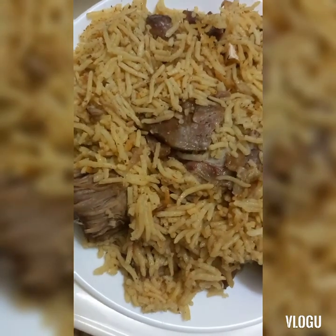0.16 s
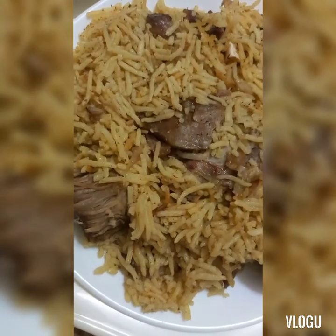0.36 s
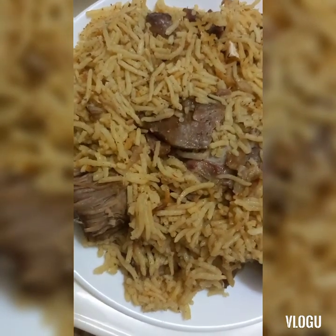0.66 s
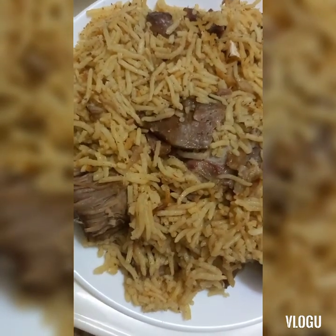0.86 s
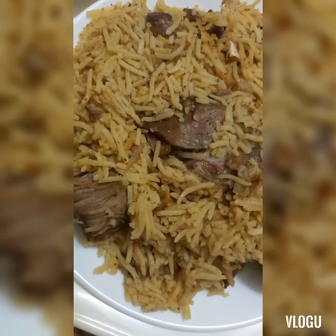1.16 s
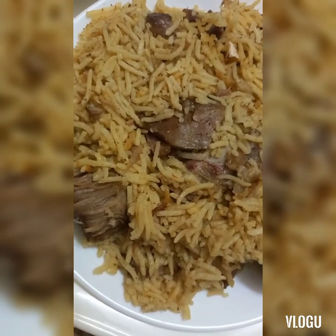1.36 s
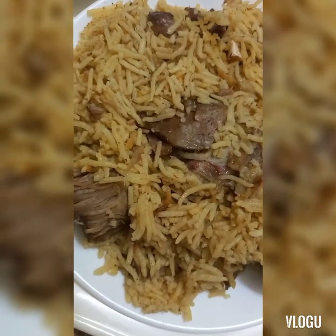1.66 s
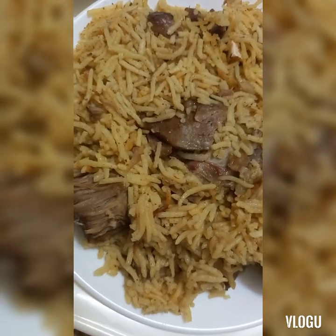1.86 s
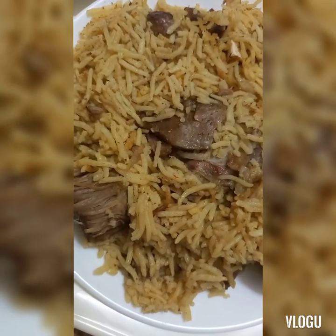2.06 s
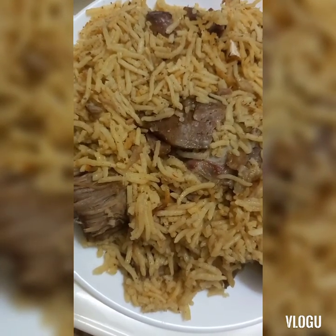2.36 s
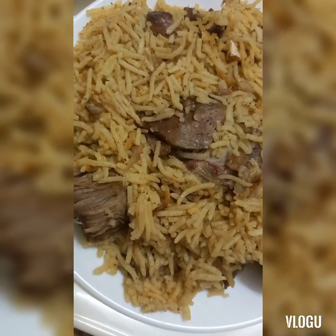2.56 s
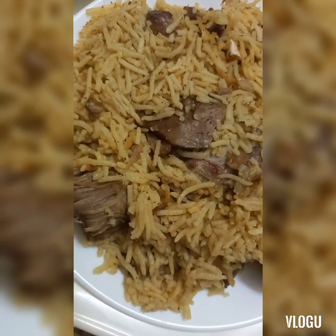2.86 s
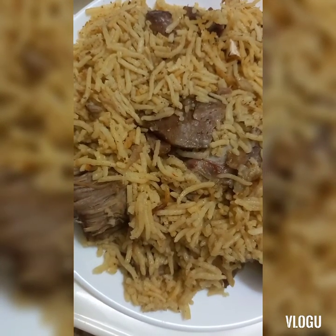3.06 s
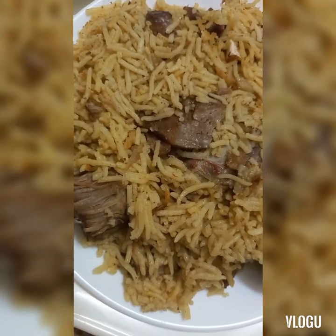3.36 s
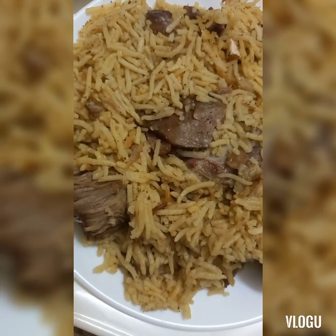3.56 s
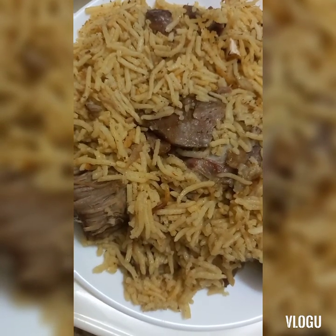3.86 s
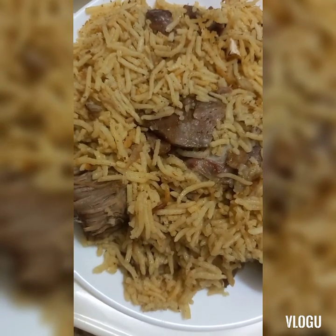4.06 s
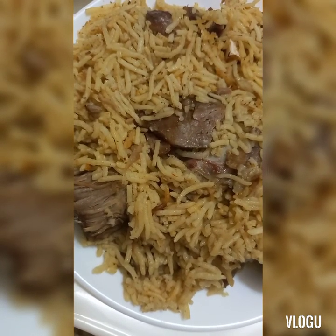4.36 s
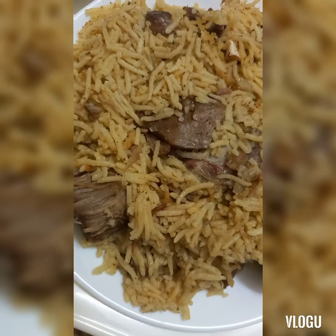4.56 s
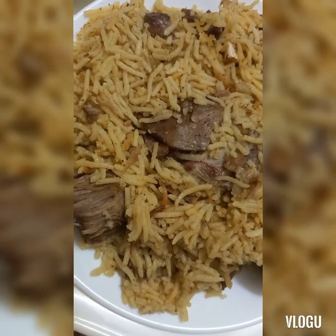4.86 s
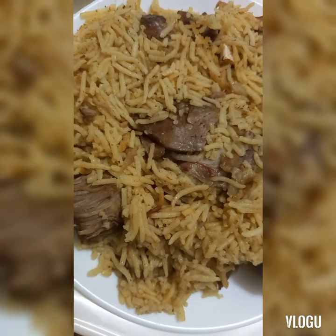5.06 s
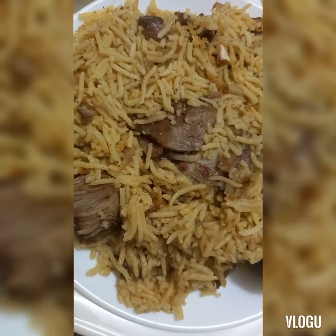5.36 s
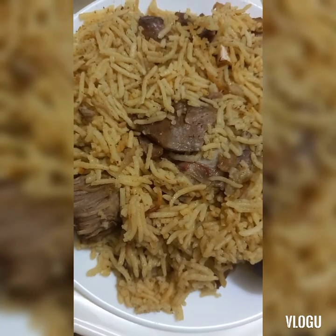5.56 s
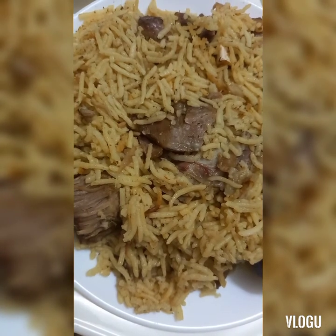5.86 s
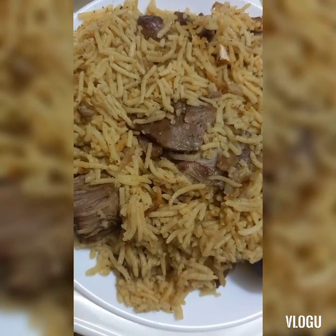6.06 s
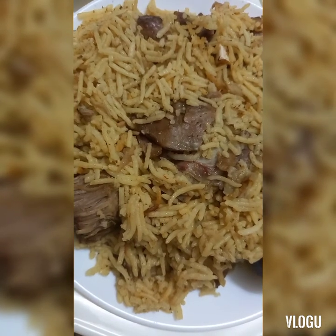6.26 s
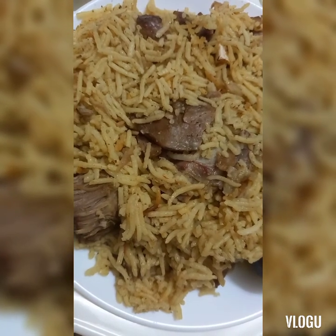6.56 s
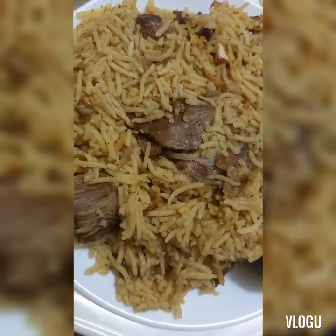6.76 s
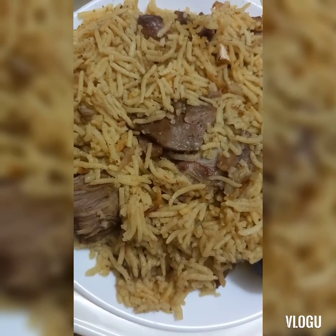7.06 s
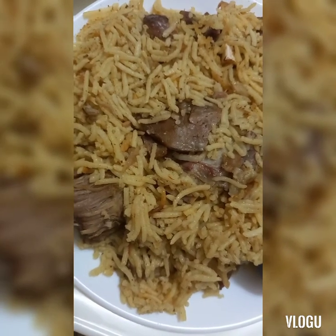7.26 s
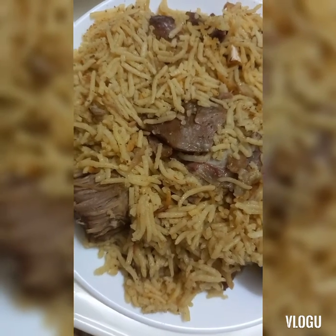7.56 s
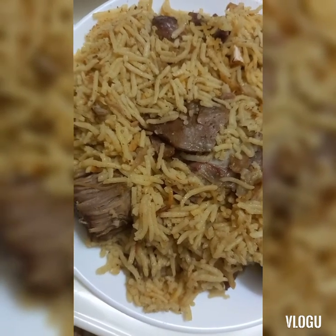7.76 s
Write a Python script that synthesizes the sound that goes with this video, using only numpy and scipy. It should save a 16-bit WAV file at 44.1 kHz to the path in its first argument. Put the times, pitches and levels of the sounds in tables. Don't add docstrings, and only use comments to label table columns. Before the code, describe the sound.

A refrigerator runs without pause in a kitchen. Its compressor gives a deep, steady hum, strongest a little above two hundred hertz, over a noisy low fan rumble coloured by the small room. Faint motor whines waver quickly above it, with a fine rattle and a thin coolant hiss that surges slightly. A phone picks it up in mono, quiet and plain, with no beginning or end.

```python
import sys
import numpy as np
from scipy import signal
from scipy.fft import rfft, irfft
from scipy.io import wavfile
from scipy.ndimage import uniform_filter1d

SR = 44100
rng = np.random.default_rng(int(sys.argv[2]) if len(sys.argv) > 2 else 0)


def boost_factor(decibels):
    exponent = np.asarray(decibels, float) / 20
    return 10 ** exponent


def digitize_waveform(pressure):
    field = np.atleast_2d(pressure).T
    bounded = np.clip(field, -1, 1)
    quanta = np.round(bounded * 32767).astype(np.int16)
    wavfile.write(sys.argv[1], SR, quanta)


N = 349272


def walk(rate):
    hold = int(SR / rate)
    steps = np.repeat(rng.standard_normal(N // hold + 1), hold)
    return 1.25 * uniform_filter1d(uniform_filter1d(steps, hold), hold)[:N]


def tone(phase, db):
    return np.sqrt(2) * boost_factor(db) * np.sin(phase + 2 * np.pi * rng.random())


SHAFT_HZ = 57.639
KNOCK_S = .0066

# t/s, change of turn rate/Hz
SHAFT_DRIFT = [
    (0, .005),
    (3.2, .005),
    (4.2, -.001),
    (5.2, -.006),
    (6.5, -.006),
    (7.2, -.001),
]


def shaft_phase(t):
    turn_hz = SHAFT_HZ + np.interp(t, *np.transpose(SHAFT_DRIFT))
    return 2 * np.pi * np.cumsum(turn_hz) / SR


# order of the shaft rate, level/dB
PUMP = [(1, -66.6), (2, -48.9), (4, -41.4), (5, -64.2), (6, -60.7), (7, -70.4), (8, -70.6), (9, -79.3),
        (10, -77.2), (15, -79.4), (16, -80.4), (17, -85.9), (19, -78.0), (21, -82.7)]


def pump_hum(turn):
    return sum(tone(order * turn, db) for order, db in PUMP)


SLIP_HZ, SLIP_START_S = 4.8, .117
WHINE_SWAY_DB = 0.5
RING_LAG_S, KNOCK_SCATTER_RAD, KNOCK_FROM_ORDER = .0045, .15, 44

# order of the shaft rate, level/dB, lower side tone/dB, upper side tone/dB
WHINE = [(26, -79.1, -20.0, -20.0), (27, -81.6, -13.1, -10.7), (31, -79.8, -13.3, -7.7),
         (32, -86.4, -13.9, -9.4), (33, -75.0, -13.0, -14.2), (35, -85.4, -14.6, -10.4),
         (36, -86.0, -11.0, -8.2), (38, -67.1, -9.5, -15.4), (39, -82.2, 3.7, 0.8), (40, -82.0, 0.6, -5.9),
         (42, -84.3, -17.9, -7.7), (44, -86.3, -5.5, -3.5), (46, -86.8, -10.8, -7.9),
         (48, -73.1, -5.7, -3.6), (49, -69.3, -3.0, -8.4), (50, -82.7, -1.6, 0.4), (51, -92.2, 7.4, -20.0),
         (52, -93.7, 8.0, 7.5), (53, -97.6, 9.7, 2.3), (55, -92.3, 3.2, -15.5), (57, -80.9, -10.8, -12.9),
         (60, -89.0, -15.0, -11.5), (62, -91.7, -20.0, -20.0), (66, -96.4, -20.0, -15.9),
         (83, -95.1, -16.9, -20.0), (88, -96.7, -12.1, -20.0), (96, -93.8, -6.6, -10.9),
         (108, -95.8, -5.6, -20.0), (111, -92.8, -12.8, -10.7), (128, -94.2, -20.0, -16.7)]


def slot_whine(t, turn):
    rock = np.exp(2j * np.pi * SLIP_HZ * (t - SLIP_START_S))
    sway = boost_factor(WHINE_SWAY_DB * walk(2.52))
    out = np.zeros(N)
    for order, db, lower_db, upper_db in WHINE:
        lower = boost_factor(lower_db) / rock
        upper = boost_factor(upper_db) * rock
        second_lower = np.minimum(np.abs(lower[0]), 1) * lower / rock
        second_upper = np.minimum(np.abs(upper[0]), 1) * upper * rock
        wobble = 1 - 1j * (lower + upper) - (second_lower + second_upper) / 2
        delay = KNOCK_S + RING_LAG_S * (order < KNOCK_FROM_ORDER)
        start = -2 * np.pi * order * SHAFT_HZ * delay + KNOCK_SCATTER_RAD * rng.standard_normal()
        whine = np.imag(wobble * np.exp(1j * (order * turn + start)))
        out += np.sqrt(2) * boost_factor(db) * np.roll(sway, order * 2900) * whine
    return out


def compressor():
    t = np.arange(N) / SR
    turn = shaft_phase(t)
    return pump_hum(turn) + slot_whine(t, turn)


OTHER_ORDERS_DB, OTHER_SPREAD_DB = 4, 4


def rattle():
    named = {round(row[0]) for row in [*PUMP, *WHINE]}
    orders = np.array([k for k in range(11, 230) if k not in named])
    scatter = OTHER_SPREAD_DB * rng.standard_normal(len(orders))
    gain = boost_factor(air_db(orders * SHAFT_HZ) + OTHER_ORDERS_DB + scatter)
    spectrum = np.zeros(2049, complex)
    spectrum[orders] = np.sqrt(2) * 2048 * gain * np.exp(2j * np.pi * rng.random(len(orders)))
    place = np.arange(N) * SHAFT_HZ / SR % 1 * 4096
    return np.interp(place, np.arange(4096), irfft(spectrum), period=4096)


# f/Hz, level/dB
TONES = [
    (85.1, -55.6),
    (120.08, -69.7),
    (480.3, -71.4),
    (5643.8, -94),
    (5648.6, -98),
]


def steady_tones():
    t = np.arange(N) / SR
    return sum(tone(2 * np.pi * hz * t, db) for hz, db in TONES)


# f/Hz, density/dB per Hz
AIR_SPECTRUM = [(18, -99.5), (27, -94), (33, -84.3), (45, -85.5), (60, -91), (95, -76), (125, -86.5),
                (165, -77.5), (250, -82), (330, -76.0), (450, -81), (520, -84),
                (750, -95.5), (1000, -94), (1300, -96.0), (2000, -96.5), (2500, -101.8), (3100, -101.9),
        (3600, -108.0), (6000, -111.6), (9000, -107.9), (10800, -119.6), (12600, -113.7), (14000, -119.4),
        (14700, -124.5), (15700, -125.5)]
# f/Hz, width/Hz, lift/dB
ROOM_MODES = [(53.4, 9.4, 10.2), (72.0, 16.3, 20.0), (108.7, 17.1, 10.1), (141.8, 22.5, 13.3),
              (169.6, 2.4, 3.7), (186.0, 14.7, 9.2), (201.7, 12.5, 12.8), (220.0, 18.1, 12.9),
              (235.8, 9.2, 10.5), (263.7, 30.0, 8.1), (279.4, 2.6, -7.5), (301.0, 6.6, 5.2),
              (307.6, 6.4, -9.9), (330.5, 2.4, 2.6), (351.0, 12.8, -6.0), (368.3, 4.4, 4.3),
              (381.5, 4.0, 2.8), (413.0, 3.2, -2.8), (448.0, 17.1, 5.6), (484.4, 28.3, -4.3)]
# f/Hz, width/Hz, lift/dB
CABINET = [(543, 37, -5.1), (655, 28, 5.4), (717, 8, 6.5), (745, 17, -4.5), (864, 97, 5.5), (936, 8, -4.5),
           (1032, 29, 4.0), (1282, 10, -3.4), (1498, 45, 2.3), (2182, 49, 6.5), (2253, 62, 5.3),
           (2343, 12, -3.0), (2790, 224, 6.5), (2822, 25, 5.9), (2971, 34, 8.0), (3302, 37, 4.4),
           (3411, 71, -3.5), (4629, 40, -3.0), (5445, 270, -2.2), (5647, 75, 5.1), (6325, 226, 3.0),
           (6942, 321, 4.0), (7611, 103, -2.2), (8809, 80, 2.3), (9803, 209, 2.4), (11868, 47, 3.8),
           (12821, 57, 4.0), (13691, 240, 4.5), (14274, 250, 5.8), (15612, 98, 7.6)]


def air_db(hz):
    points = np.array(AIR_SPECTRUM)
    db = np.interp(np.log(np.maximum(hz, 1)), np.log(points[:, 0]), points[:, 1])
    for f, width, lift in [*ROOM_MODES, *CABINET]:
        db = db + lift / (1 + (2 * (hz - f) / width) ** 2)
    return db


def room_echo(hz):
    t60_s, wet_db = .2, -12
    n = np.arange(SR // 2)
    tail = rng.standard_normal(SR // 2) * boost_factor(-60 * n / SR / t60_s)
    wet = boost_factor(wet_db) * np.clip(hz / 1500 - .4, 0, 1)
    return (1 + wet * rfft(tail / np.sqrt(np.sum(tail ** 2)), N)) / np.sqrt(1 + wet ** 2)


SPURT_RISE_S, SPURT_FALL_S = .025, 0.032

# t/s, strength/dB, brightness/dB per octave
SPURTS = [(.02, 1, .5), (.47, 2, .3), (.93, .7, 1.1), (1.1, 1.5, 0), (1.52, 1.5, .3), (1.68, -1.0, 2),
          (1.98, 1.0, 0), (2.25, 1, .9), (2.54, -2, -.3), (3.35, 1.5, .6), (3.7, .7, .7), (3.84, -.9, 0),
          (4.14, 2, 1.2), (4.46, -1.0, -1.1), (4.89, 2.5, 0), (5.03, 1.5, -.8), (5.3, 0, .6), (5.85, 2, 0),
          (6.07, .9, .4), (6.29, 2, -.8), (6.4, -1.5, 2), (6.49, 2.5, 1), (6.98, .8, 0), (7.15, -1.5, -.6),
          (7.38, 1.5, -2), (7.5, 1.2, .9), (7.87, -1.3, -.3)]


def spurts(t):
    out = np.zeros((2, len(t)))
    for start, *size in SPURTS:
        spread = np.where(t < start, SPURT_RISE_S, SPURT_FALL_S)
        out += np.outer(size, np.exp(-((t - start) / spread) ** 2 / 2))
    return out


AIR_DB = 0.27
DRAUGHT_SPLIT_HZ, CASING_SPLIT_HZ, COOLANT_SPLIT_HZ = 480, 2450, 3600
SPURT_CENTRE_HZ = 7500
RUMBLE_FOLLOWS, DRAUGHT_FOLLOWS, HISS_FOLLOWS = 1.1, .9, .7
RUMBLE_FLICKER_DB, DRAUGHT_PATCH_DB, CASING_PATCH_DB, HISS_PATCH_DB = 0.13, .9, 0.3, .8
SHARED_FLICKER_DB, CASING_PUFF_DB = .35, 1.8

# t/s, change/dB
FLOW = [(0, -0.5), (.8, 0.2), (1.7, -.4), (2.3, .4), (3.1, -0.8), (3.5, 0.2), (4.2, 0.1), (4.7, 0.4),
        (5.1, .2), (5.6, -.3), (6.0, .4), (6.8, 0), (7.3, 0.2), (7.92, 0)]


def air():
    hz = np.fft.rfftfreq(N, 1 / SR)
    density = boost_factor(air_db(hz) + AIR_DB) * np.sqrt(SR / 2)
    noise = rfft(rng.standard_normal(N)) * density * room_echo(hz)
    t = np.arange(0, N, 64) / SR
    flow = np.interp(t, *np.transpose(FLOW))
    spurt, bright = spurts(t)
    shared = SHARED_FLICKER_DB * walk(9)

    def band(lo, hi, db, patch_db):
        surge = np.repeat(db - np.mean(db), 64)[:N] + shared + patch_db * walk(8)
        return boost_factor(surge) * irfft(noise * ((hz >= lo) & (hz < hi)), N)

    out = band(0, DRAUGHT_SPLIT_HZ, RUMBLE_FOLLOWS * flow, RUMBLE_FLICKER_DB)
    edges = np.geomspace(DRAUGHT_SPLIT_HZ, CASING_SPLIT_HZ, 6)
    for lo, hi in zip(edges, edges[1:]):
        out += band(lo, hi, DRAUGHT_FOLLOWS * flow, DRAUGHT_PATCH_DB)
    puff = CASING_PUFF_DB * np.cos(2 * np.pi * SHAFT_HZ * (t - KNOCK_S))
    out += band(CASING_SPLIT_HZ, COOLANT_SPLIT_HZ, puff, CASING_PATCH_DB)
    edges = np.geomspace(COOLANT_SPLIT_HZ, 16500, 8)
    for lo, hi in zip(edges, edges[1:]):
        tilt = bright * np.log2(lo / SPURT_CENTRE_HZ)
        out += band(lo, hi, HISS_FOLLOWS * flow + spurt + tilt, HISS_PATCH_DB)
    return out


def scene():
    return (compressor() + rattle() + steady_tones() + air())[None]


def top_cut(x):
    return signal.sosfilt(signal.butter(12, 15755, fs=SR, output="sos"), x)


def record(dry):
    return top_cut(dry)


dry = scene()
out = record(dry)
digitize_waveform(out)
```